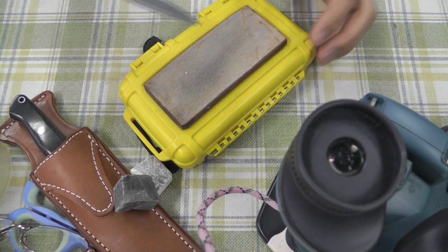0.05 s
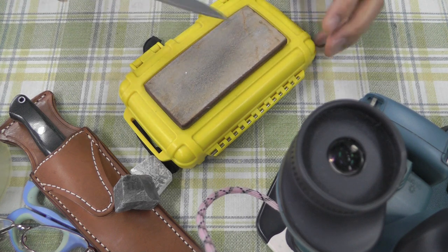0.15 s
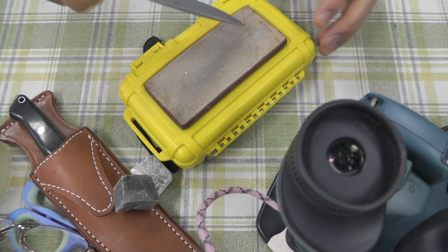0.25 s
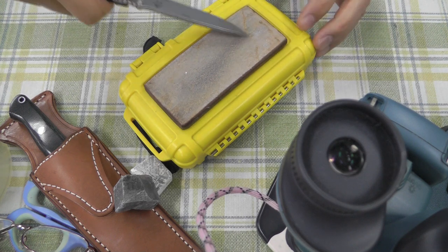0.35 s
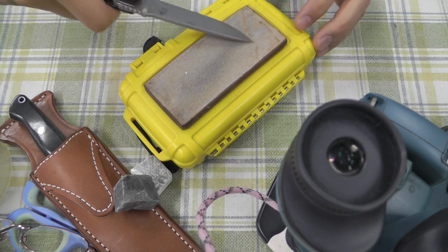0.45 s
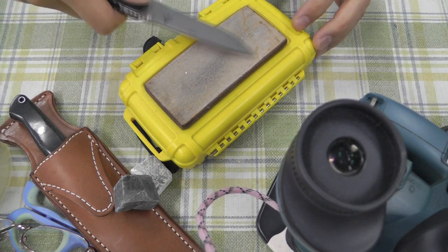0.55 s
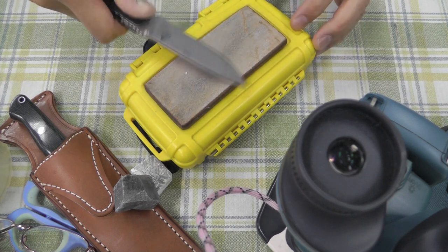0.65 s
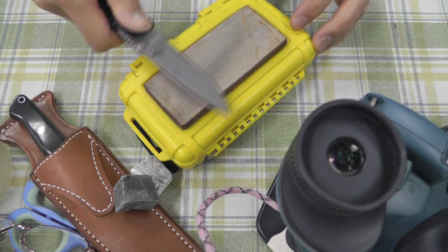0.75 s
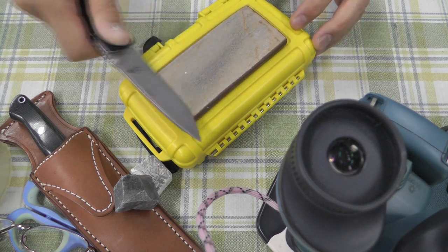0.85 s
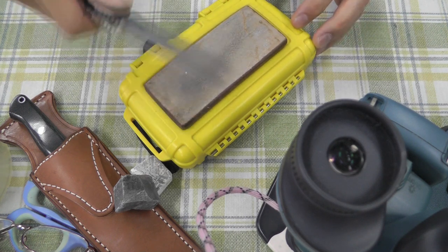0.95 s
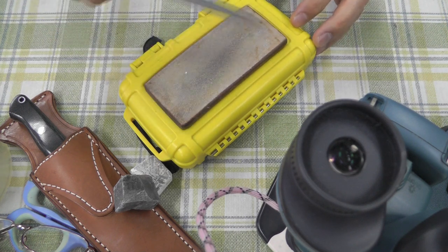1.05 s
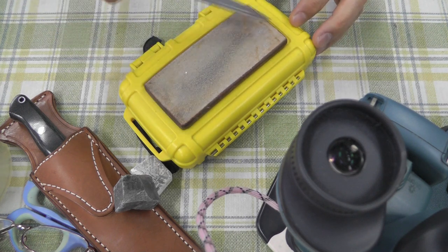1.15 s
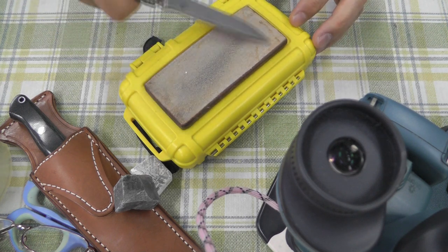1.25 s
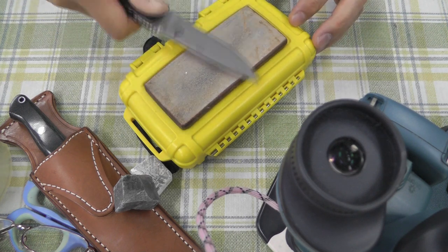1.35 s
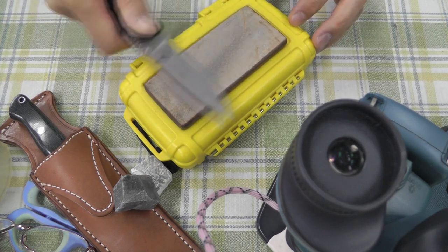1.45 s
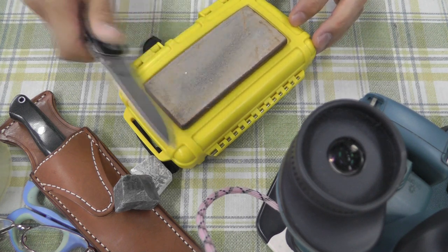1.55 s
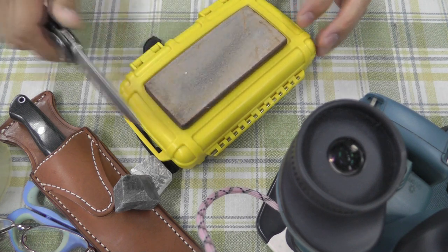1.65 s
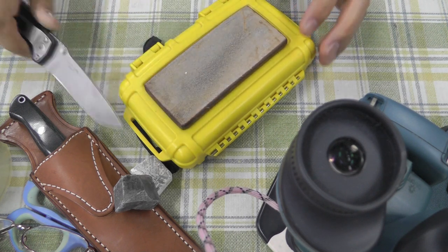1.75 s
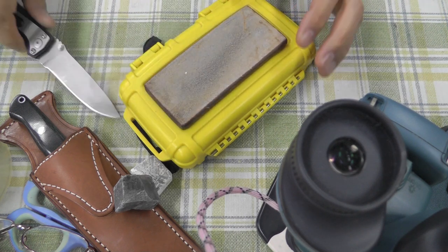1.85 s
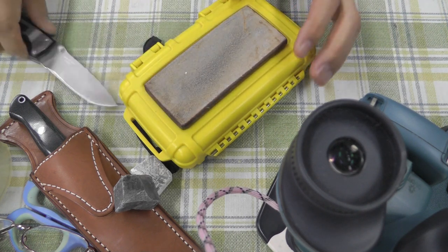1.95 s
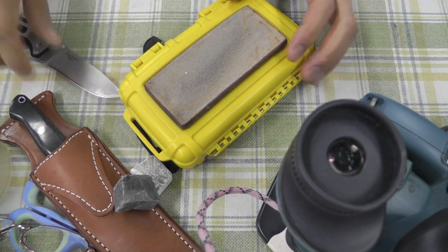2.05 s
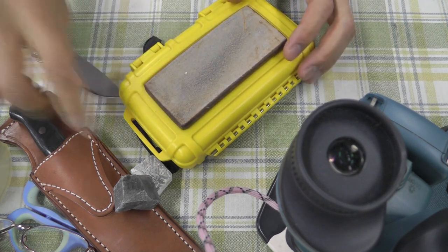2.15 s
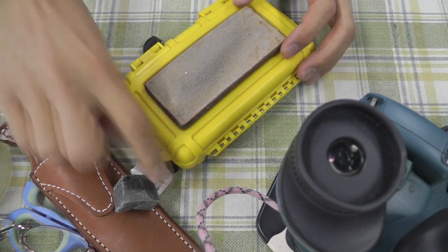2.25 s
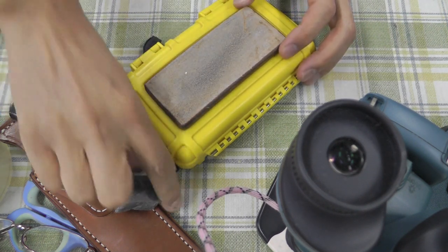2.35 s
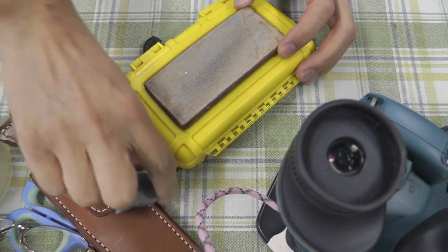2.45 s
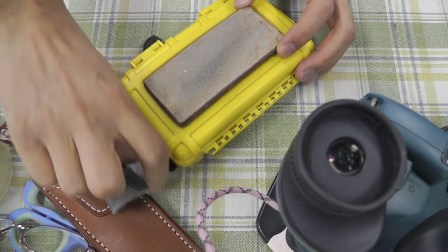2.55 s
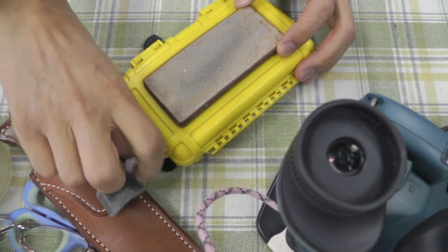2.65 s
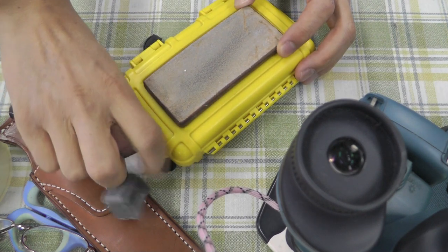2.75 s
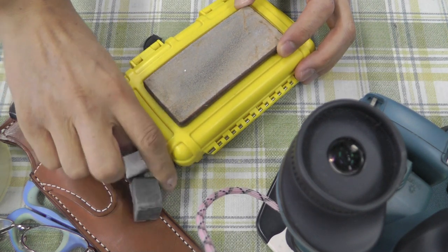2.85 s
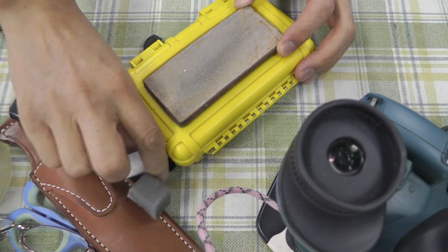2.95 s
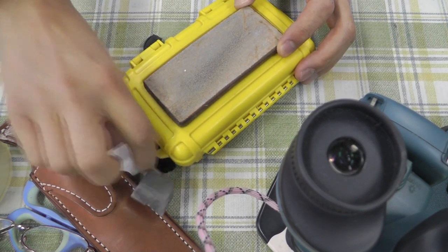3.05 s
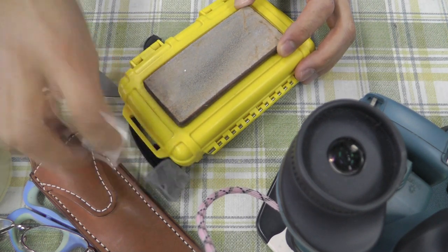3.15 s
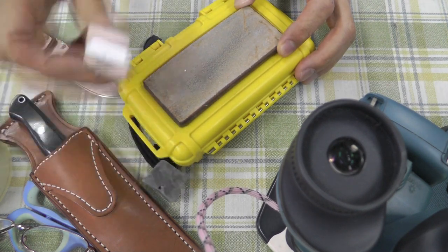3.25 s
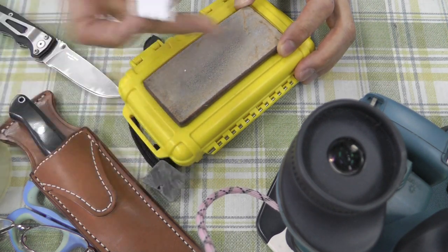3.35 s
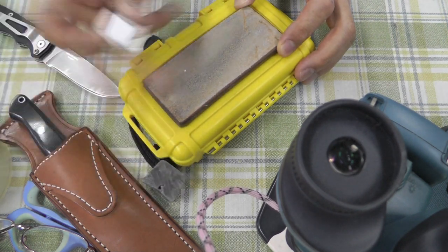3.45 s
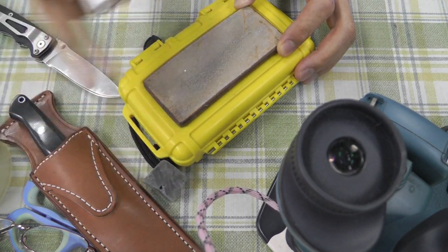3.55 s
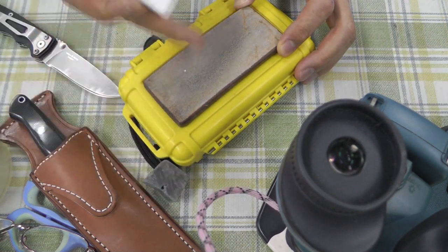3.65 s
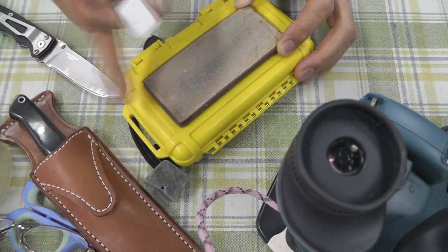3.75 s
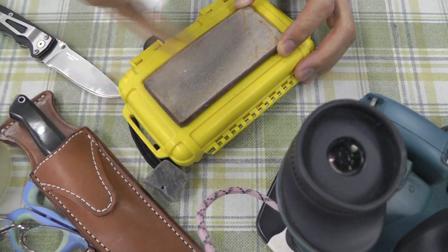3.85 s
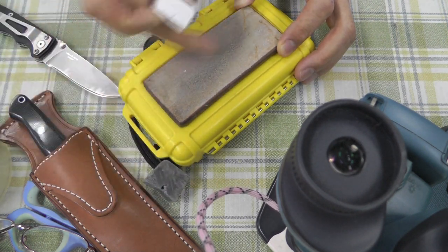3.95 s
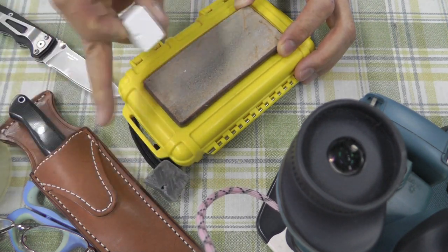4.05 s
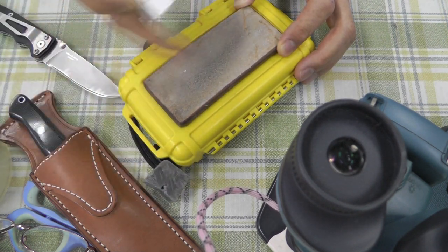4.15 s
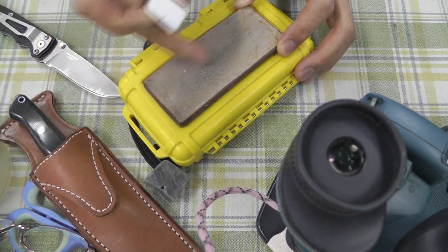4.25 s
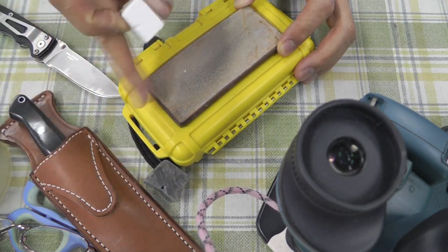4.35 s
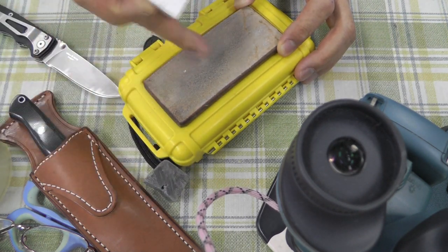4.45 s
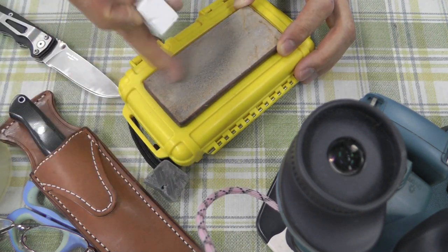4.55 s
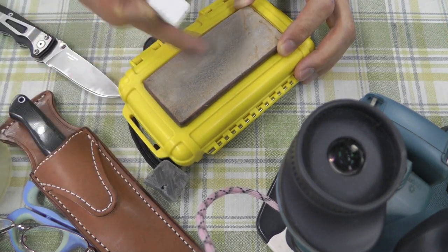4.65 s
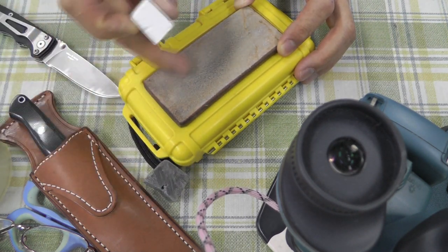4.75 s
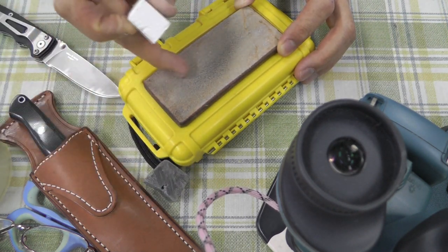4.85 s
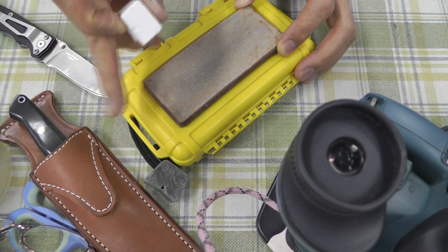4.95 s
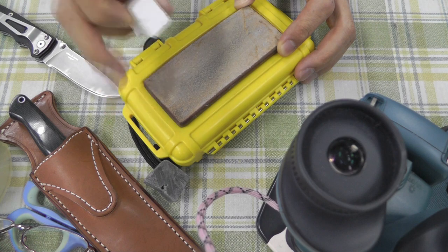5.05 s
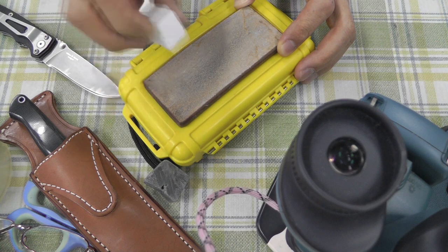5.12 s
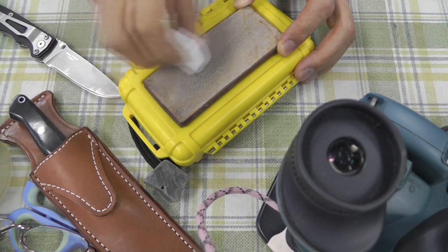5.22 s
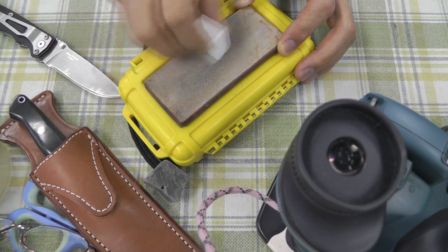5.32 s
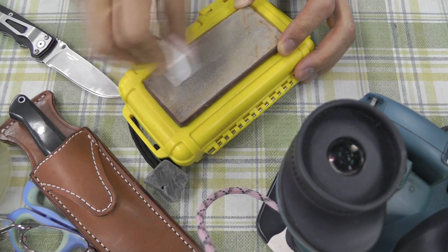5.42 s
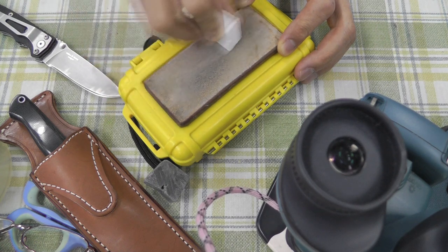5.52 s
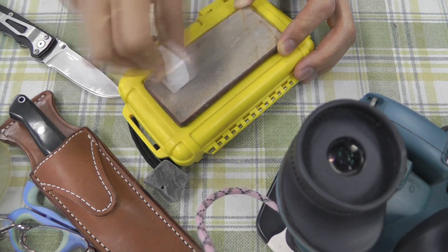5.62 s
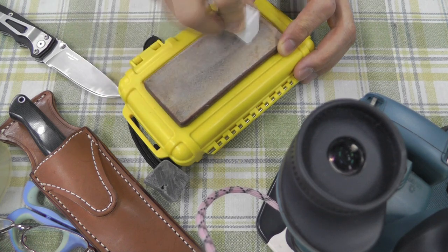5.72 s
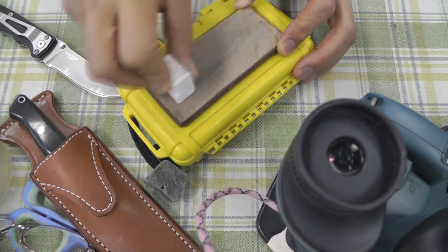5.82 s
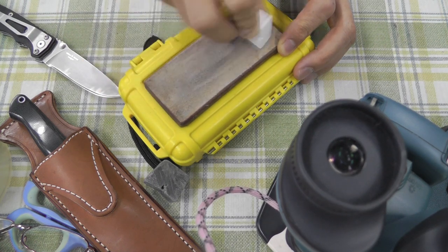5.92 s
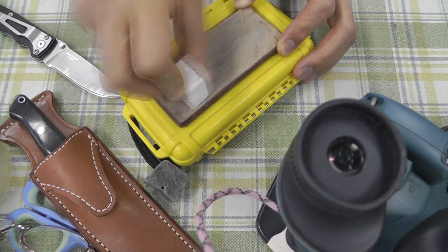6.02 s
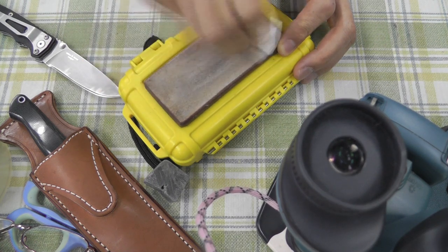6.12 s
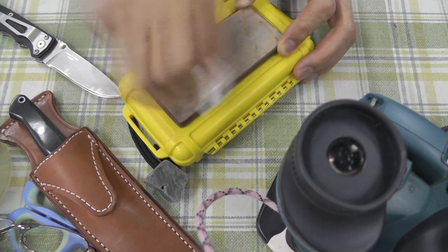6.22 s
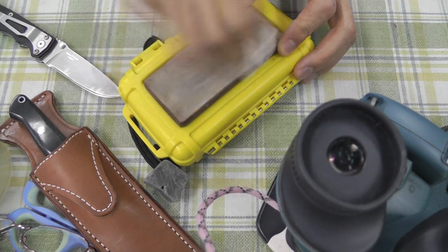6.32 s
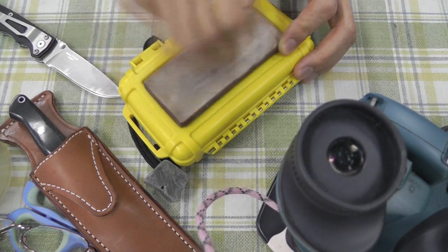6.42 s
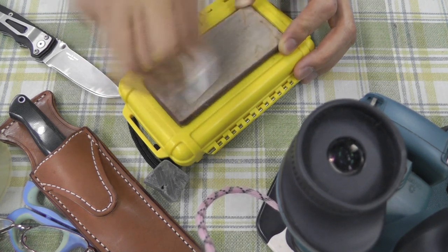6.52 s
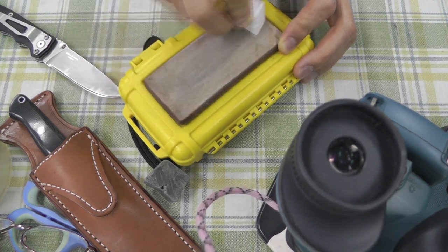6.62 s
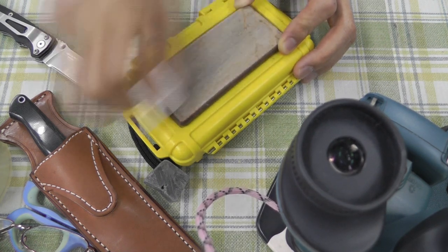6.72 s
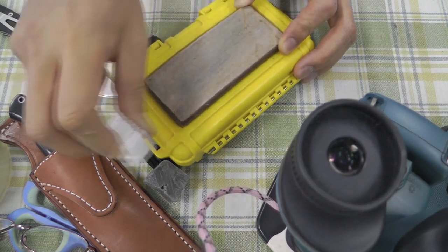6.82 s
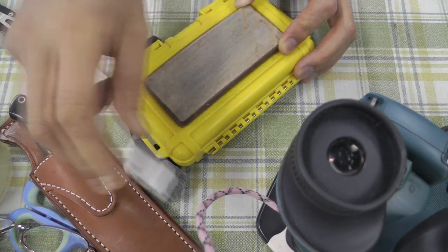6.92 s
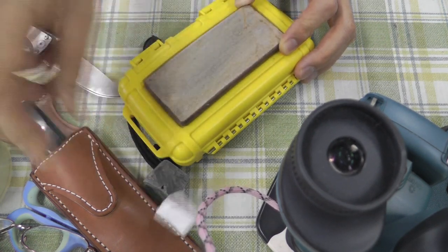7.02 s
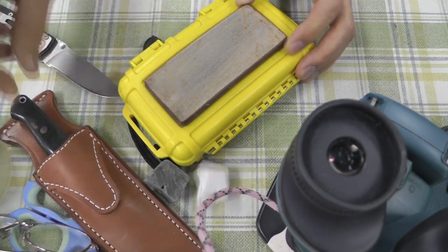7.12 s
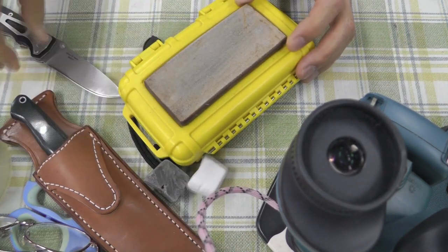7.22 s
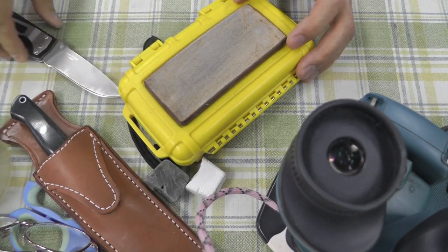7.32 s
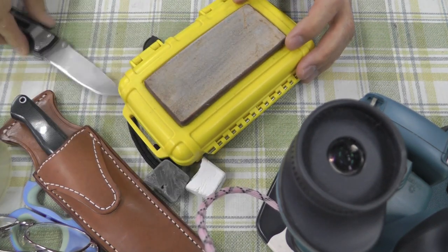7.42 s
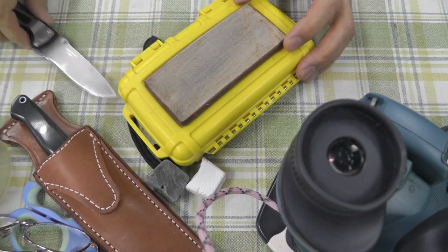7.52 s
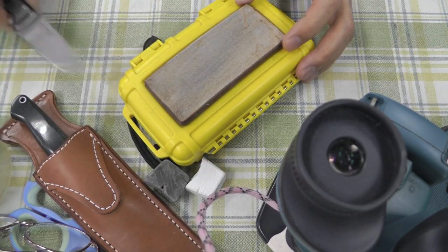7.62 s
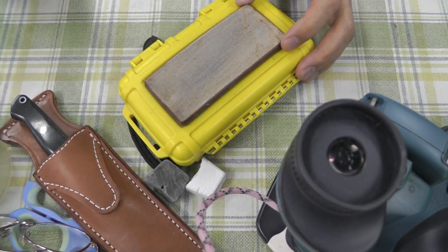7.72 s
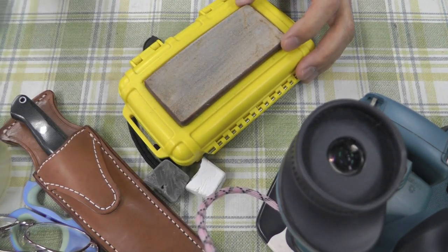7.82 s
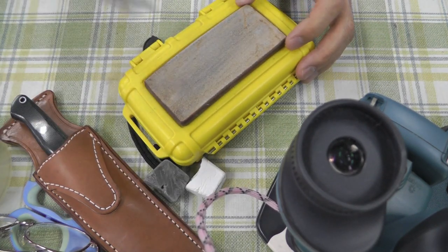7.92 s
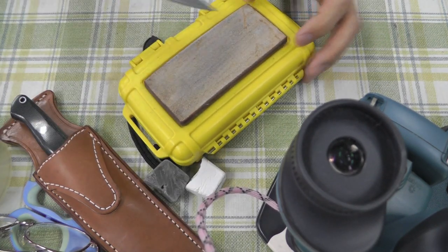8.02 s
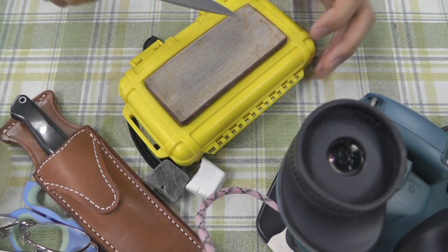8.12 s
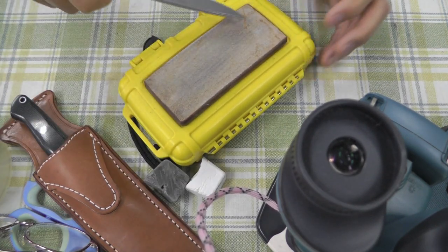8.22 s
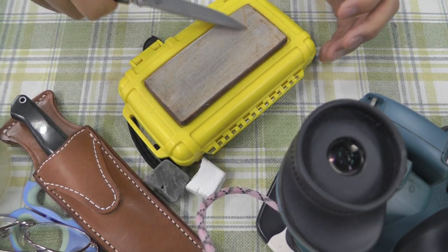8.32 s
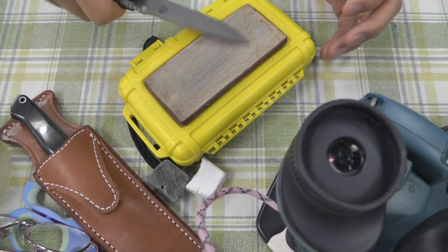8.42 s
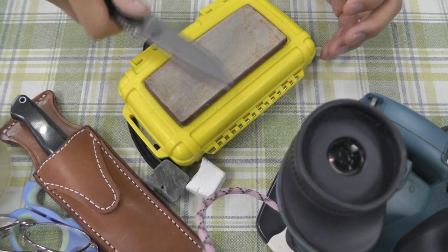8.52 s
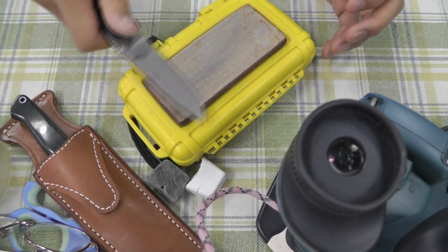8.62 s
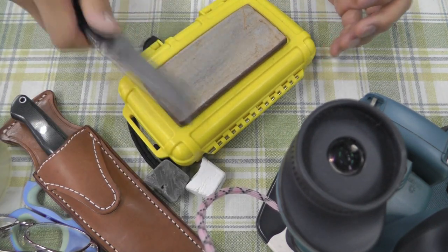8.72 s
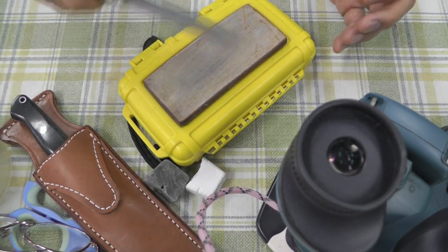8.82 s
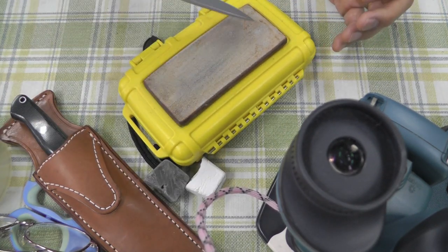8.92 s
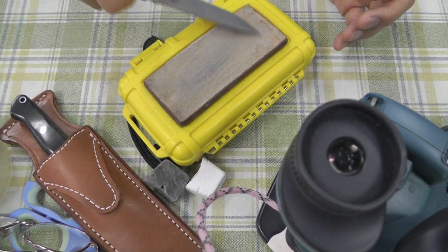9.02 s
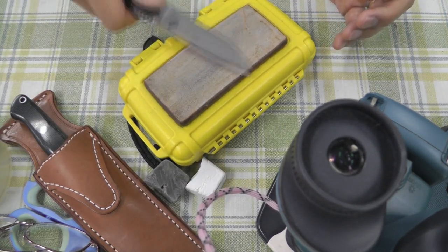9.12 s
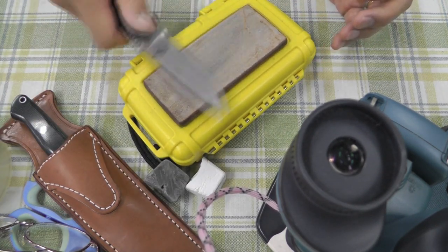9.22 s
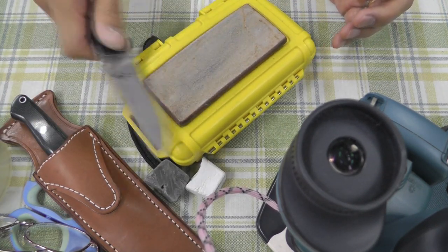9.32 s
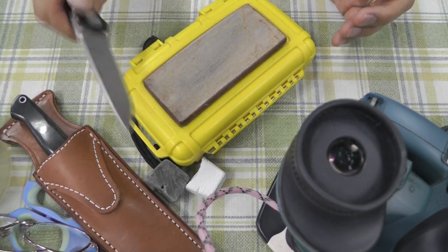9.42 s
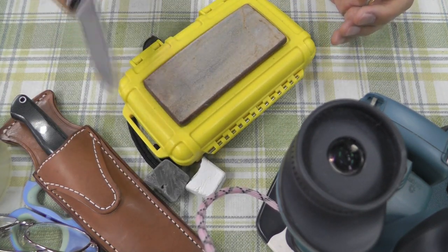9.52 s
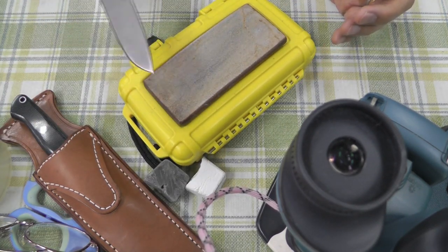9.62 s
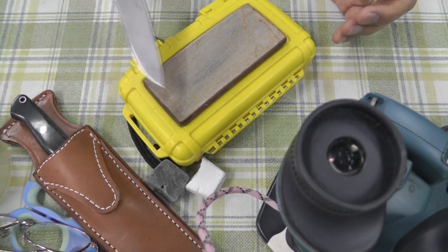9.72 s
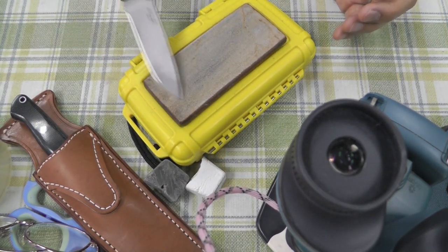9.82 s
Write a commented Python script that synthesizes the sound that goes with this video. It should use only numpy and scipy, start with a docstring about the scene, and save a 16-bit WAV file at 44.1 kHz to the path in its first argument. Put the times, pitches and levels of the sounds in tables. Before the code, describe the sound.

In a quiet small room, very close, a knife makes two soft hissing strokes over leather mounted on a hollow plastic case, each begun by a dull knock. It is laid on a cloth-covered table with a muffled clatter; fumbling and finger taps follow. A waxy block then rubs quickly to and fro with low drumming rasps, is dropped and tumbles, and the knife takes two more strokes.

```python
"""Stropping a knife

A quiet small room, two close microphone ports: a knife is drawn four times over a leather strop on a hollow case.
Between the stroke pairs it is laid on the cloth-covered table, a finger wipes the leather, and a block of
compound, fetched from beside a leather sheath, is scrubbed to and fro and dropped. Sliding is coloured noise of
tiny slips; landings are ringing modes of case, table, steel or block; the case drums under drags and knocks.
"""
import sys
import numpy as np
from scipy import signal
from scipy.fft import rfft, irfft, next_fast_len
from scipy.io import wavfile

SR = 44100
rng = np.random.default_rng(int(sys.argv[2]) if len(sys.argv) > 2 else 0)


def persist_wave(psi):
    """Save psi, clipped to +-1, as 16-bit WAV."""
    counts = np.round(np.clip(psi, -1, 1) * 32767).astype(np.int16)
    wavfile.write(sys.argv[1], SR, np.atleast_2d(counts).T)


N = 435266
TIME = np.arange(N) / SR


def amp(db):
    """Decibels to gain."""
    return 10 ** (np.asarray(db) / 20)


def unit(x):
    """Scales to rms 1."""
    return x / np.sqrt(np.mean(x ** 2) + 1e-20)


def peaked(x, db):
    """Scales to a peak level."""
    return amp(db) * x / abs(x).max()


def read(points, hz):
    """Reads a table on a log-frequency axis."""
    f, value = np.transpose(points)
    return np.interp(np.log(hz + 1), np.log(f + 1), value)


def add(mix, s, sound):
    """Mixes a sound in at time s."""
    part = mix[max(round(s * SR), 0):][:len(sound)]
    part += sound[:len(part)]


def colour(x, points, power=1):
    """Filters by a table of (Hz, dB), its decibels multiplied by power."""
    size = next_fast_len(len(x) + 2048)
    gain = amp(power * read(points, np.fft.rfftfreq(size, 1 / SR)))
    return irfft(rfft(x, size) * gain, size)[:len(x)]


def highpass(x, hz, order=2):
    """Causal high-pass."""
    return signal.sosfilt(signal.butter(order, min(hz, SR / 3), "high", fs=SR, output="sos"), x)


def waver(per_s):
    """Smooth chance of rms 1 that takes a new random value per_s times a second."""
    knots = rng.standard_normal(20000)
    return unit(np.interp(TIME * per_s, np.arange(len(knots)), knots))


def grit(per_s, patchy_db, patches_per_s):
    """Tiny slips of random size, clumped where the surface catches."""
    slips = rng.standard_normal(N) * (rng.random(N) < per_s / SR)
    return unit(slips * amp(patchy_db * waver(patches_per_s)))


def hiss(slips, points):
    """The direct sound of slips, with a surface's colour and no bass."""
    return unit(highpass(colour(slips, points), points[0][0], order=3))


def arch_of(length, crest):
    """Sine-shaped rise to 1 at the crest, a share of the move, and fall to 0."""
    u = np.linspace(0, 1, length)
    return np.sin(np.interp(u, [0, np.clip(crest, .05, .95), 1], [0, np.pi / 2, 0]))


def swell(start, end, crest, fullness):
    """Gain of one rise and fall, silent outside it; a smaller fullness power makes it broader."""
    gain = np.zeros(N)
    length = round(max(end - start, .01) * SR)
    add(gain, start, arch_of(length, crest) ** abs(fullness))
    return gain


# Low hum of the still room: hz, level_db (relative, per Hz)
ROOM_HUM = [(25,-20), (48,-23), (65,2.5), (100,-6.5), (146,13), (185,-1), (260,4), (340,-2.5), (680,-7.5),
            (1000,-16), (1700,-22), (2200,-58), (4000,-32), (16000,-60)]
# Faint hiss of the still room: hz, level_db (relative, per Hz)
ROOM_HISS = [(1500,2), (2200,2), (2950,9), (3900,0), (6500,2.5), (9500,-6), (16000,-11.5)]
# Slow drift of that hiss: time_s, change_db
HISS_DRIFT = [(0,0.5), (2.8,3), (3.6,-3.5), (6.8,1.5), (7.3,5), (9.8,1)]
HUM_DB, HISS_DB = -51.5, -67  # rms, the hiss before its drift
WHINE_HZ, WHINE_START_S, WHINE_END_S = 2067, 6.85, 8.65
WHINE_DB = -77.5  # before its flutter and swell


def air():
    """Steady low hum and faint drifting hiss of the room, with a thin unsteady whine for a while."""
    turns = np.cumsum(WHINE_HZ + 14 * waver(60)) / SR
    tone = np.sqrt(2) * amp(2 * waver(14)) * np.sin(2 * np.pi * turns)
    whine = amp(WHINE_DB) * swell(WHINE_START_S, WHINE_END_S, crest=1.0, fullness=0.067) * tone
    hum = amp(HUM_DB) * unit(colour(rng.standard_normal(N), ROOM_HUM))
    hiss_gain = amp(HISS_DB + np.interp(TIME, *np.transpose(HISS_DRIFT)))
    return hum + hiss_gain * hiss(rng.standard_normal(N), ROOM_HISS) + whine


# Decay of the small furnished room: hz, t60_s
ROOM_DECAY = [(120, 0.5), (330, 0.26), (900, 0.25), (2500, 0.15), (6000, 0.17), (14000, 0.1)]


def room(x, first_s=.007):
    """Dense echoes of a small furnished room, each band dying at its own speed."""
    taps = rng.standard_normal(SR // 2) * (rng.random(SR // 2) < .1)
    hz, t, z = signal.stft(taps, SR, nperseg=256)
    decay = amp(-60 * t / read(ROOM_DECAY, hz)[:, None])
    tail = signal.istft(z * decay, SR, nperseg=256)[1]
    tail = np.pad(tail, (round(abs(first_s) * SR), 0))
    return signal.oaconvolve(x, tail / np.linalg.norm(tail))[:N]


def ring_of(modes, tilt_db, damping=1, scatter_db=4.0, detune=0.04, knee_hz=650, contact_s=0.0011):
    """A body's answer to one push: decaying modes, the upper ones favoured by a harder contact.

    Tilt is in dB per octave up to the knee; each push scatters levels and pitches a little.
    """
    hz, db, t60 = np.transpose(modes)[:, :, None]
    t = np.arange(SR // 5) / SR
    weight, shift = rng.standard_normal((2, len(modes), 1))
    tilt = tilt_db * np.log2(np.minimum(hz, knee_hz) / hz[0])
    gain = amp(db + tilt + scatter_db * weight - 60 * t * damping / t60)
    sign = np.where(np.arange(len(modes)) // 2 % 2, -1, 1)[:, None]  # modes alternate in pairs
    ring = (sign * gain * np.sin(2 * np.pi * hz * (1 + detune * shift) * t)).sum(0)
    return highpass(ring * (1 - np.exp(-t / contact_s)), 91)


# Hollow case and table top, before tilt, scatter and damping: pitch_hz, level_db, t60_s
CASE_MODES = [(155.8, -5, 0.072), (191.3, -13.5, 0.29), (252, -8.5, 0.036), (269.7, 4.5, .12),
              (317, -7.5, 0.16), (379, -4, 0.063), (498, -1, 0.066), (540.4, -0.5, 0.038),
              (621, -2.5, 0.047), (688, -3, 0.064), (873, -7.5, 0.049), (1060, -18, 0.069),
              (1312, -11, 0.046), (1414, -40.5, 0.035), (1620, -31, 0.11)]


def case_ring(tilt_db, damping):
    """The modes of the hollow case, pushed through the strop."""
    return ring_of(CASE_MODES, tilt_db, damping)


def drum(force, ring):
    """A force sounding through a ringing body, whose answer is scaled to unit energy."""
    return signal.oaconvolve(force, ring / np.linalg.norm(ring))


# Colour of a point contact: hz, level_db (relative, per Hz)
TICK_COLOUR = [(900,18.5), (1500,12), (2100,-1), (3200,2), (4100,-3), (5500,1), (8000,-7.5), (10000,-17.5),
               (12000,-22), (16000,-30)]


def tick(db, t60=0.016, rise_s=0.00073):
    """The short crack at a point of contact: noise with a fast rise and a decay."""
    t = np.arange(SR // 10) / SR
    gain = amp(db + 14.0 - 60 * t / t60) * (1 - np.exp(-t / rise_s))
    return gain * hiss(rng.standard_normal(len(t)), TICK_COLOUR)


def chatter(t60=0.033, floor_db=-9):
    """The force of a hard thing that lands and rattles on the spot for an instant."""
    t = np.arange(SR // 20) / SR
    return (t == 0) + amp(floor_db - 60 * t / t60) * rng.standard_normal(len(t))


def off_hand(x, delay_s=0.000596, travel=.25, gain=0.44):
    """Adds the echo off the moving hand, whose changing delay shifts the colour of a hiss."""
    lag = delay_s * SR * np.exp(travel * waver(9))
    return unit(x + gain * np.interp(np.arange(N) - lag, np.arange(N), x))


def sweep(rows, slips, points, drag_crest, hiss_crest, fullness, damping, quickening=0.057, split_hz=7500):
    """Short slides: case drag and direct hiss each swell and die; the faster, the brighter the hiss."""
    out, rasp = np.zeros(N), off_hand(hiss(slips, points))
    treble = colour(rasp, [(split_hz / 2, -30), (split_hz, 0)])
    for start, end, drag_db, tilt_db, hiss_db in rows:
        span = slice(round(start * SR), round(max(end, start + .01) * SR))
        length = span.stop - span.start
        drag, speed = arch_of(length, drag_crest), arch_of(length, hiss_crest)
        force = unit(drag ** (fullness * 1.08) * slips[span])
        add(out, start, amp(drag_db) * drum(force, case_ring(tilt_db, damping)))
        # slow parts of the move lose some treble
        bright = rasp[span] - (1 - speed ** abs(quickening)) * treble[span]
        add(out, start, amp(hiss_db) * unit(speed ** fullness * bright))
    return out


# Fingertip tapping down and wiping the leather; hold_s is the wait before it slides:
# start_s, hold_s, slide_s, tap_peak_db, drag_db, hiss_db
FINGER_WIPES = [(3.489,0.0076,0.067,-15,-35,-39.5), (3.786,0.016,0.037,-10.5,-32.5,-39),
                (4.027,0.022,0.061,-18.5,-32,-38), (4.34,0.014,0.047,-14.5,-32,-38.5),
                (4.591,0.001,0.071,-23.5,-37,-51), (4.766,0.032,0.065,-29,-35.5,-48),
                (4.974,0.00056,0.038,-27.5,-31,-43)]
# Hand, knife and block scuffing over cloth and sheath:
# start_s, end_s, drag_db, tilt_db_per_octave, hiss_db
HAND_SCUFFS = [(1.78,1.9,-44,-7,-56.5), (2.145,2.235,-36.5,-4.5,-78), (2.432,2.485,-29.5,-1.5,-38.5),
               (2.538,2.665,-34,0.5,-43), (2.675,2.78,-44,7,-50.5), (2.93,3.07,-42.5,-3,-51),
               (3.13,3.19,-41,12,-44.5), (7.13,7.2,-36,4,-49), (7.5,7.63,-46,-8.5,-57.5)]
# Hands brushing cloth and knife handle: start_s, end_s, level_db
HAND_RUSTLES = [(0.13,0.338,-58.5), (1.796,2.1,-55), (7.45,7.573,-51), (7.688,7.768,-58), (7.82,8.153,-58),
                (9.538,9.643,-53), (9.693,9.806,-57)]
# Colours of skin on leather, of scuffs and of cloth, each: hz, level_db (relative, per Hz)
SKIN_COLOUR = [(880, 2.5), (1500, -1), (2250, -12.5), (3380, -4), (3810, -15.5), (4330, -4.5), (4920, -2.5),
               (6240, -6.5), (6760, -2.5), (9190, -5), (10800, -8), (12000, -18), (16000, -24)]
SCUFF_COLOUR = [(1000,24.5), (1500,13), (2150,-4.5), (3100,4), (4000,-1.5), (5600,0), (7000,-3), (8200,-7),
                (9000,-10), (12000,-21), (16000,-28)]
CLOTH_COLOUR = [(1120, -4.5), (1900, -13), (2690, -7.5), (4240, -7.5), (5590, -3.5), (8050, -8), (8800, -9),
                (16000, -32)]
WIPE_TILT_DB = 4  # brightness of the drag, dB per octave


def fingers():
    """Skin speeds up along the leather and flicks off its end; the hand scuffs sheath and brushes cloth."""
    slides = []
    for s, hold, length, _, drag_db, hiss_db in FINGER_WIPES:
        slides.append((s + hold, s + hold + length, drag_db, WIPE_TILT_DB, hiss_db))
    skin = grit(12000, patchy_db=-2, patches_per_s=150)
    wipes = sweep(slides, skin, SKIN_COLOUR, drag_crest=0.77, hiss_crest=1.0, fullness=0.49, damping=1.8)
    weave = grit(2400, patchy_db=2.5, patches_per_s=230)
    scuffs = sweep(HAND_SCUFFS, weave, SCUFF_COLOUR, drag_crest=0.035, hiss_crest=0.41,
                   fullness=0.21, damping=1.07, quickening=.1)
    # a quick swell and a slower fade
    brushing = sum(amp(db) * swell(start, end, crest=0.21, fullness=0.86) for start, end, db in HAND_RUSTLES)
    return wipes + scuffs + brushing * hiss(grit(3000, patchy_db=-3.5, patches_per_s=13), CLOTH_COLOUR)


# Compound block scrubbed to and fro, each pass lasting until just before the next:
# start_s, drag_db, tilt_db_per_octave, rasp_db
BLOCK_RUBS = [(5.322,-34,2.5,-43.5), (5.415,-26,-0.5,-41), (5.516,-27.5,3,-38.5), (5.62,-24.5,1,-39),
              (5.723,-20,4,-37), (5.829,-25,1.5,-39), (5.933,-20,0,-38), (6.046,-21,3.5,-38.5),
              (6.152,-25.5,-0.5,-37.5), (6.259,-21.5,3.5,-38), (6.368,-27,2.5,-37.5), (6.487,-26.5,2.5,-38),
              (6.608,-30.5,3,-39), (6.73,-21.5,0,-35)]
# Colour of wax on leather: hz, level_db (relative, per Hz)
RASP_COLOUR = [(1200, -18), (1700, 2), (2080, -11.5), (2850, 1), (3900, -11), (4700, -1), (5550, 2.5),
               (6100, 1), (6700, 2.5), (7800, -2), (9400, 0), (10600, -5), (11500, -10.5), (16000, -18)]
# Stick and slip of the block early in a push: start_s, length_s, peak_db
BLOCK_JUDDERS = [(5.416,.05,-12), (5.626,0.037,-6.5), (5.831,0.043,-5), (6.048,0.045,-10.5),
                 (6.264,.03,-8.5), (6.29,0.033,-12.5), (6.493,.056,-6.5)]
# Partials of the judder, before its envelope: multiple of the slip rate, level_db
JUDDER_PARTIALS = [(1,3.5), (2,3), (3,-11), (4,-26), (5,-15.5)]
TURN_S, LAST_PASS_S = 0.013, 0.12  # rest at each turn, length of the last pass
SLIP_HZ = 256.9  # centre of the uneven slip rate


def compound():
    """The waxy block rasps on the leather and at times judders in a short, uneven train of slips."""
    ends = [row[0] - TURN_S for row in BLOCK_RUBS[1:]] + [BLOCK_RUBS[-1][0] + LAST_PASS_S]
    passes = [(start, end, *levels) for (start, *levels), end in zip(BLOCK_RUBS, ends)]
    wax = grit(5000, patchy_db=0.5, patches_per_s=160)
    out = sweep(passes, wax, RASP_COLOUR, drag_crest=0.29, hiss_crest=0.42, fullness=0.78, damping=2.25)
    unrest, grip = waver(180), waver(300)
    for s, length, db in BLOCK_JUDDERS:
        arch = np.hanning(round(length * SR))
        span = slice(round(s * SR), round(s * SR) + len(arch))
        turns = np.cumsum(SLIP_HZ * (1 + 0.0755 * unrest[span])) / SR
        shake = np.zeros(len(arch))
        for k, partial_db in JUDDER_PARTIALS:
            wave = np.sin(2 * np.pi * (round(k) * turns + rng.random()))
            # the overtones die first as the slips soften
            shake += amp(partial_db) * arch ** (1 + k / 2) * wave
        add(out, s, peaked(shake * amp(1.55 * grip[span]), db))
    return out


# Blade, hand and block bumping strop or case: start_s, peak_db, tilt_db_per_octave (hardness), tick_db
CASE_KNOCKS = [(.043,-39.5,-8,-52), (0.088,-30.5,-8,-65), (.474,-13.5,-2.5,-54), (1.298,-6,-2.5,-40.5),
               (1.319,-19,4,-52), (1.58,-19,5,-45), (2.43,-18.5,31,-50), (2.677,-22.5,-8,-37),
               (2.801,-24,-7,-59), (2.851,-23.5,2.5,-59), (2.918,-13.5,0.5,-36.5), (3.026,-13.5,-3.5,-43),
               (3.045,-18.5,-1,-50), (3.206,-5.5,5,-36), (4.676,-20,-12,-67), (4.766,-29,-13,-76),
               (5.329,-10,1,-65), (6.036,-13.5,-1,-54), (6.727,-8,2,-34.5), (7.423,-35,1,-43.5),
               (8.397,-16,-1,-51.5), (8.636,-37,16,-48), (9.083,-6.5,5.5,-43), (9.096,-19,-16,-35.5),
               (9.109,-12,1.5,-46), (9.274,-23,-3.5,-53), (9.34,-35,-4,-57)]
# Knife laid on the table: start_s, thud_peak_db, tilt_db_per_octave, steel_peak_db, tick_db
KNIFE_CLATTER = [(1.962,-5.5,1.5,-49,-30), (2.001,-14,1,-34,-42), (2.021,-18,-7,-32,-52),
                 (2.038,-15.5,-3,-36,-47), (2.056,-6,-15,-26.5,-28), (2.134,-11,-12,-25,-43)]
# Block dropped and tumbling to rest: start_s, thud_peak_db, tilt_db_per_octave, clack_peak_db, tick_db
BLOCK_TUMBLES = [(7.119,-8.5,6,-10,-27.5), (7.127,-9,-13,-38,-49), (7.153,-10.5,-7,-29,-52),
                 (7.185,-17,-10,-43,-41), (7.21,-6.5,0,-9.5,-33), (7.243,-12,-5,-18,-52),
                 (7.262,-23,2,-34,-43), (7.329,-22.5,9.5,-37,-57), (7.349,-21,2,-25,-45.5)]
# Modes of the table under its cloth, of the knife's blade and liners, and of the block,
# each before scatter and damping: pitch_hz, level_db, t60_s
TABLE_MODES = [(159,-29.5,0.095), (244,5.5,0.052), (272,-1,0.11), (358,1.5,0.033), (432,3.5,0.052),
               (510,3,0.057), (676,-25,0.045), (970,-18.5,0.033), (1393,-16,0.028), (1800,-10,0.0018)]
STEEL_MODES = [(2910,-17,0.058), (3270,0,.02), (3950,2,0.012), (4460,-1,0.0077), (5000,-1,0.01),
               (5400,1,0.0088), (6030,3,0.01), (7100,-11,0.0071), (7850,-6.5,0.011)]
BLOCK_MODES = [(558,10.5,0.065), (698,-21,0.1), (960,18,0.016), (1010,2,0.024), (1310,2,0.024),
               (1600,1,0.028)]
SYMPATHY_DB = -13.5  # peak of the case against a thud on the table beside it
TAP_TILT_DB, TAP_TICK_DB = -4.5, -52  # hardness of a fingertip tap in dB per octave, and its tick
TOUCH_LEAD_S = .006  # the skin ticks just before the weight of the finger lands


def knocks():
    """Landings thump the case and tick; on the table the knife chinks, the block clacks, the case hums along."""
    out = np.zeros(N)
    for s, db, tilt_db, tick_db in CASE_KNOCKS:
        add(out, s, peaked(case_ring(tilt_db, damping=1.57), db))
        add(out, s, tick(tick_db))
    for s, _, _, tap_db, _, _ in FINGER_WIPES:
        add(out, s - TOUCH_LEAD_S, tick(TAP_TICK_DB))
        add(out, s, peaked(case_ring(TAP_TILT_DB, damping=1.45), tap_db))
    for rows, modes in (KNIFE_CLATTER, STEEL_MODES), (BLOCK_TUMBLES, BLOCK_MODES):
        for s, db, tilt_db, ring_db, tick_db in rows:
            thud = highpass(ring_of(TABLE_MODES, tilt_db, damping=2.2), hz=141)
            add(out, s, peaked(thud, db))
            sympathy = highpass(case_ring(tilt_db=3.5, damping=0.51), hz=216, order=4)
            add(out, s, peaked(sympathy, db + SYMPATHY_DB))
            rattle = drum(chatter(), ring_of(modes, 0, damping=2.0, scatter_db=1.5))
            add(out, s, peaked(rattle, ring_db))
            add(out, s, tick(tick_db, t60=0.023))
    return out


def resonate(x, hz, width):
    """A resonance that follows the curve hz, scaled to rms 1."""
    turn = np.exp(2j * np.pi * np.cumsum(hz) / SR)
    r = np.exp(-np.pi * abs(width) / SR)
    return unit((turn * signal.lfilter([1 - r], [1, -r], x / turn)).real)


def blade_notes(notes, slips):
    """The blade's resonances, gliding as the contact runs from heel to tip."""
    total = np.zeros(len(slips))
    for heel_hz, tip_hz, width_hz, db in notes:
        total += amp(db) * resonate(slips, np.linspace(heel_hz, tip_hz, len(slips)), width_hz)
    return total


# Blade strokes: the heel bears first, then the knife rolls onto its belly and is pressed home:
# start_s, heel_s, belly_s, pressure_crest (share 0-1), heel_drag_db, belly_drag_db, edge_hiss_db
BLADE_STROKES = [(0.478,0.16,0.35,0.88,-57,-32.5,-58), (1.308,.16,0.17,0.93,-39,-26,-57),
                 (8.398,0.11,0.3,.5,-67,-34,-57.5), (9.098,0.21,0.12,0.77,-42,-32,-58.5)]
# Colour of the edge on leather: hz, level_db (relative, per Hz)
EDGE_COLOUR = [(1500, -24), (2100, -16), (2800, 4.5), (3900, -12), (5000, 4), (5700, 7.5), (6900, 4),
               (7800, 4), (9400, 5.5), (10700, 0), (11800, -6), (16000, -9)]
# Low notes, against the drag, and high notes, against the edge hiss, of the blade, each:
# start_hz, end_hz, width_hz, level_db
BEND_NOTES = [(652, 579, 26.5, -14)]
SING_NOTES = [(5850, 5730, 280, -13), (8800, 9600, 710, -19)]
CATCHES_PER_S, CATCH_DB = 9.8, -19.5  # specks of grit tick under the edge; dB against its hiss


def blade():
    """Steel on leather: fine hiss from the edge, low rasp through the case, and gliding notes of the blade."""
    out = np.zeros(N)
    coarse = grit(9000, patchy_db=-1.5, patches_per_s=140)
    fine = grit(20000, patchy_db=1.5, patches_per_s=91)
    catches = hiss(grit(CATCHES_PER_S, patchy_db=6, patches_per_s=20), TICK_COLOUR)
    swish = off_hand(hiss(fine, EDGE_COLOUR)) + amp(CATCH_DB) * catches
    for touch, heel_s, belly_s, crest, heel_db, belly_db, hiss_db in BLADE_STROKES:
        roll, lift = touch + heel_s, touch + heel_s + belly_s
        span = slice(round(touch * SR), round(lift * SR))
        heel = amp(heel_db) * swell(touch, roll, crest=0.54, fullness=1)
        belly = amp(belly_db) * swell(roll, lift, crest, fullness=1.3)
        drag = (heel + belly)[span]
        edge = amp(hiss_db) * swell(touch, lift, crest, fullness=0.39)[span]
        bend = blade_notes(BEND_NOTES, coarse[span])
        sing = blade_notes(SING_NOTES, fine[span])
        add(out, touch, drum(drag * coarse[span], case_ring(tilt_db=-3, damping=1.6)))
        # the steel sings most in mid-stroke, with the most edge on the leather
        add(out, touch, drag * bend + edge * (swish[span] + unit(np.hanning(len(edge))) * sing))
    return out


# Balance of the two ports: hz, left_minus_right_db
PORT_LEAN = [(60,0), (300,0.5), (700,0.5), (1200,1.5), (2400,0.5), (4400,0.5), (6500,-0.5), (9000,3),
             (13000,1.5)]
# Spread of the echoes, before a further 1 dB cut: hz, side_minus_mid_db
ECHO_WIDTH = [(30,-30), (70,-13.5), (150,-35), (600,-24), (1300,-13), (2500,-11.5), (5000,-61),
              (9000,-13.5), (14000,-7)]


def scene():
    """All sources lie just before two close microphone ports, which hear nearly the same."""
    sliding, hits = blade() + compound() + fingers(), knocks()
    echoes = room(amp(-14.0) * sliding + amp(-13.5) * hits)
    mid = sliding + hits + echoes + air()
    side = amp(-1) * colour(room(mid, first_s=0.00087), ECHO_WIDTH)
    left = colour(mid, PORT_LEAN, 1 / 2) + side
    right = colour(mid, PORT_LEAN, -1 / 2) - side
    return np.array([left, right])


EDGE_HZ = 15850  # upper limit of the recorder


def record(dry):
    """The recorder's band limit: a steep low-pass."""
    lowpass = signal.firwin(511, EDGE_HZ, window=("kaiser", 9), fs=SR)
    return signal.oaconvolve(dry, lowpass[None], "same")


dry = scene()
out = record(dry)
persist_wave(out)
```